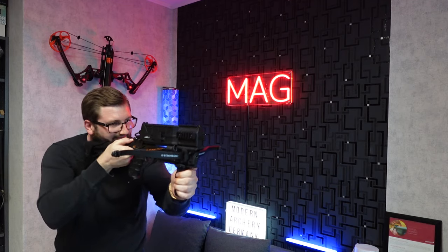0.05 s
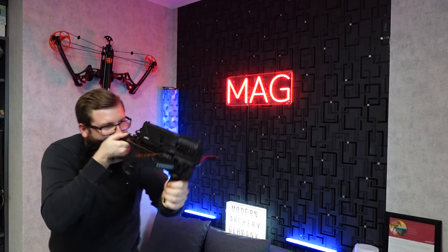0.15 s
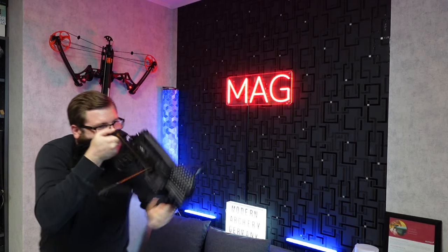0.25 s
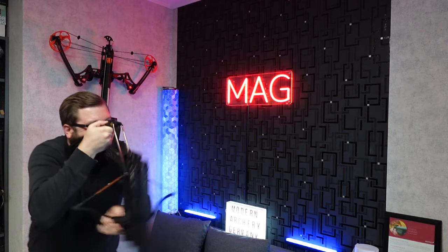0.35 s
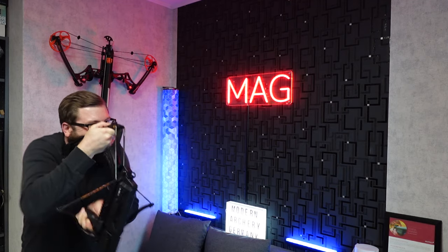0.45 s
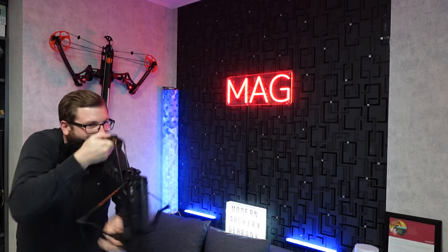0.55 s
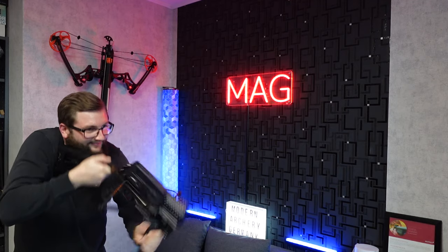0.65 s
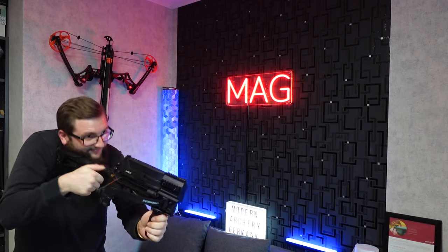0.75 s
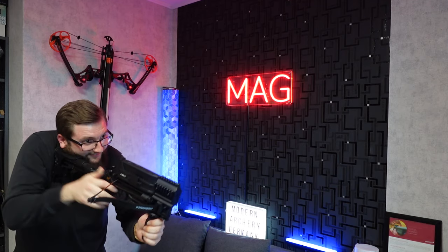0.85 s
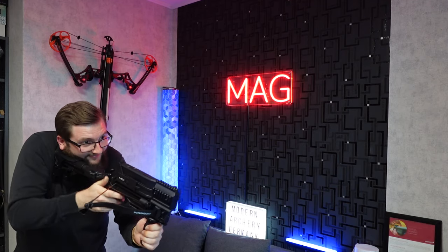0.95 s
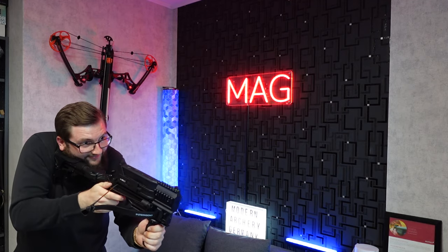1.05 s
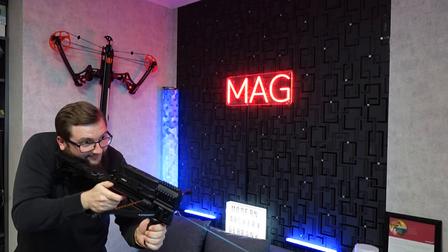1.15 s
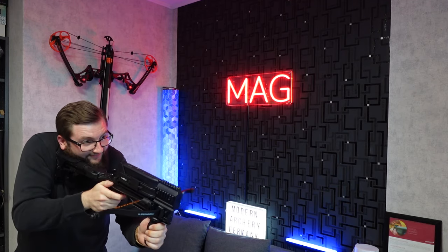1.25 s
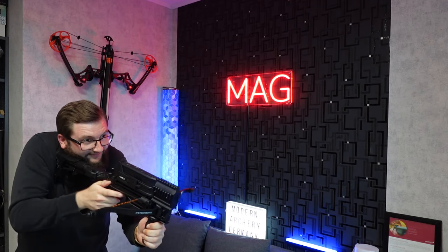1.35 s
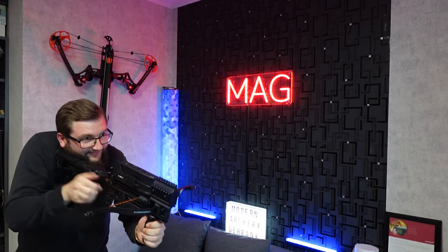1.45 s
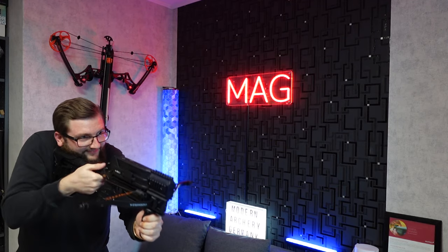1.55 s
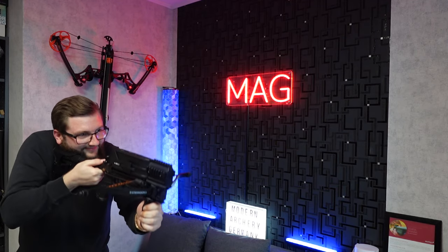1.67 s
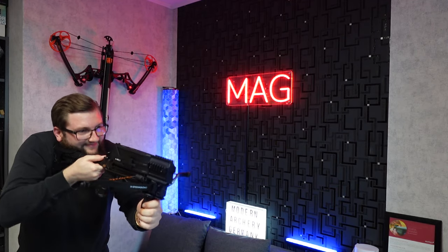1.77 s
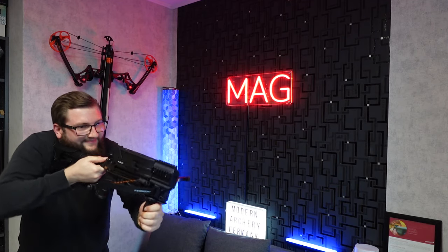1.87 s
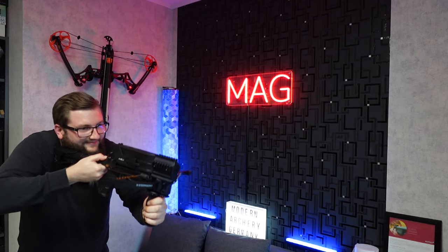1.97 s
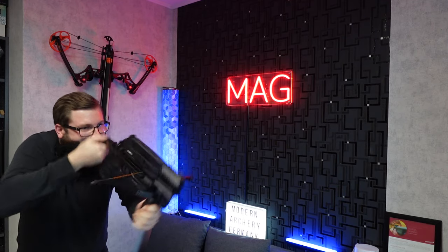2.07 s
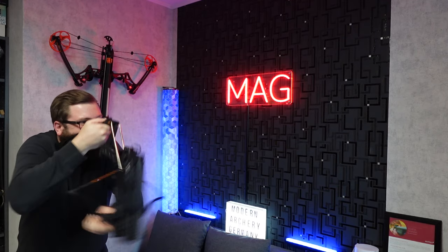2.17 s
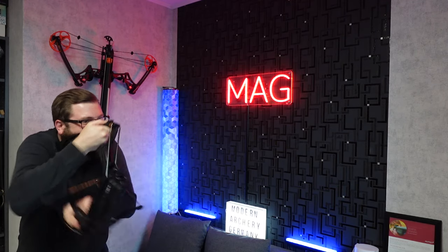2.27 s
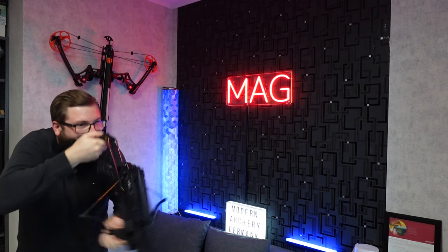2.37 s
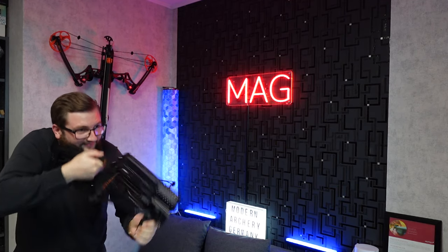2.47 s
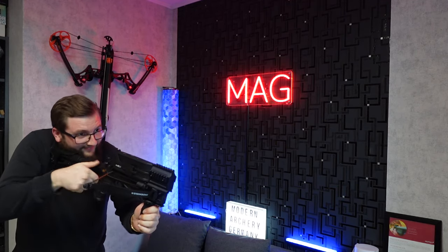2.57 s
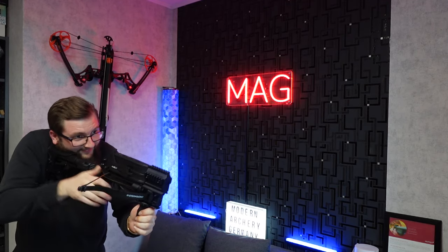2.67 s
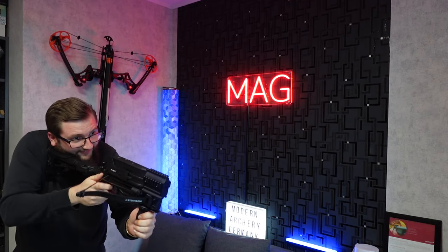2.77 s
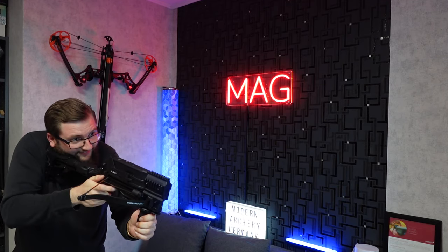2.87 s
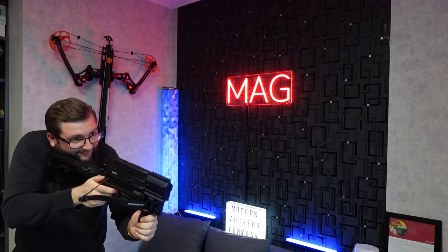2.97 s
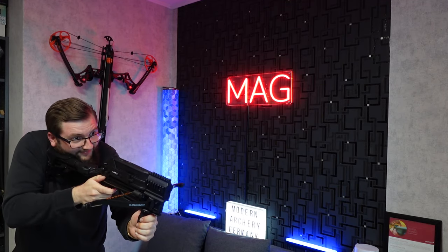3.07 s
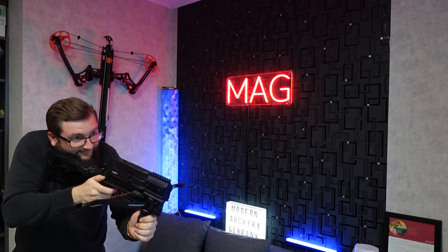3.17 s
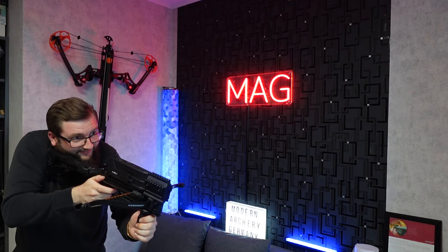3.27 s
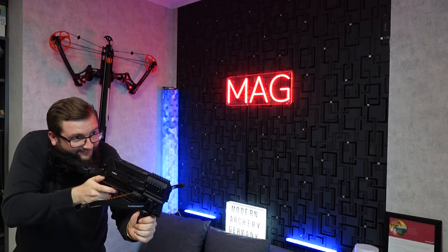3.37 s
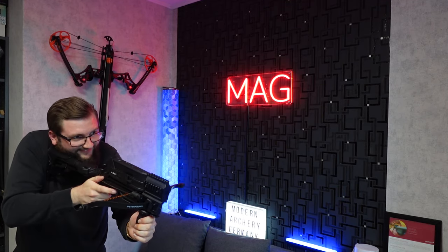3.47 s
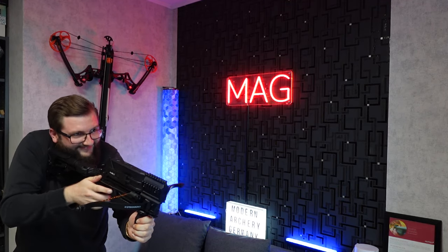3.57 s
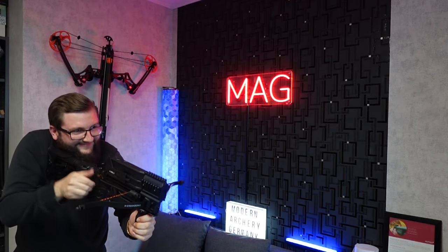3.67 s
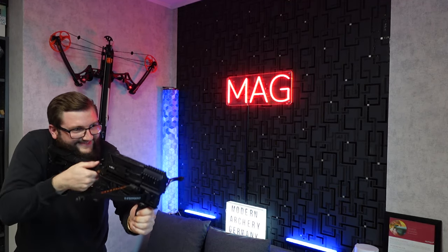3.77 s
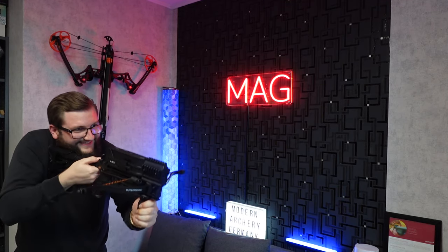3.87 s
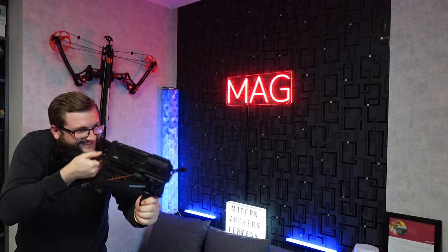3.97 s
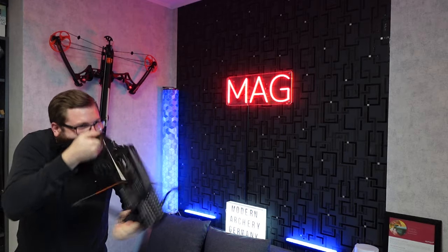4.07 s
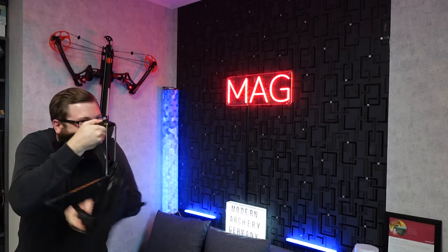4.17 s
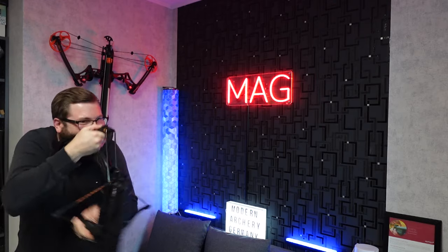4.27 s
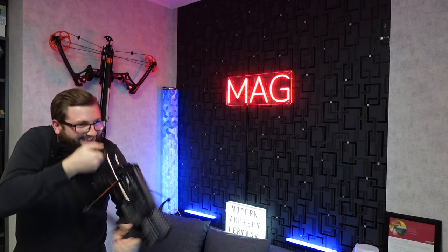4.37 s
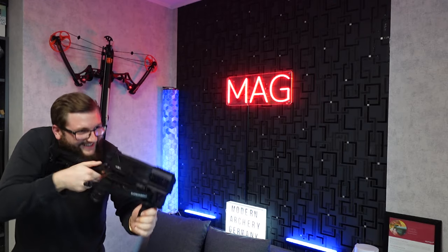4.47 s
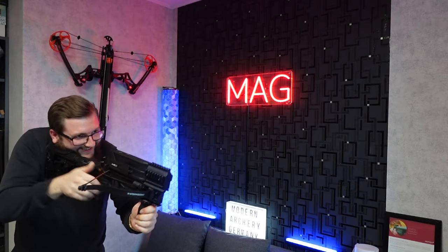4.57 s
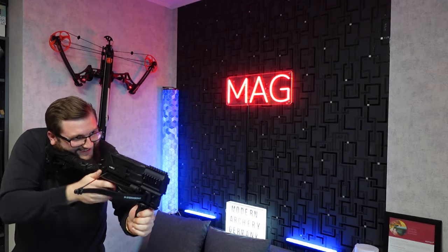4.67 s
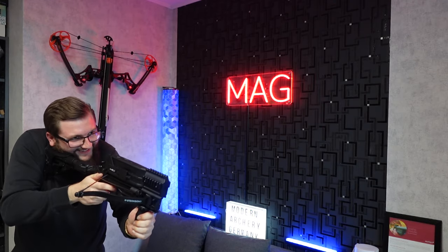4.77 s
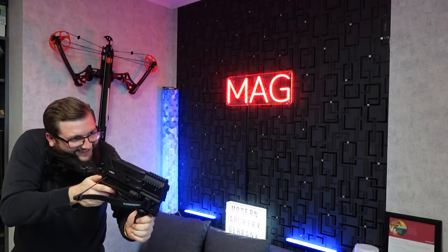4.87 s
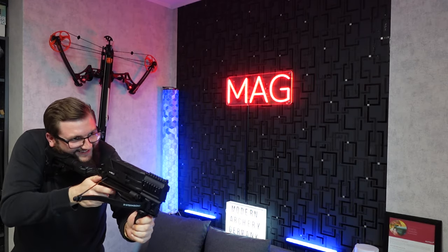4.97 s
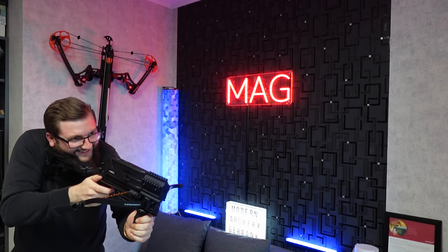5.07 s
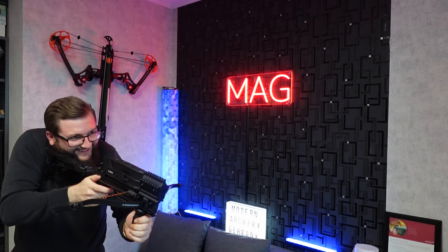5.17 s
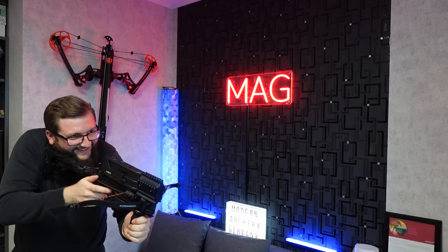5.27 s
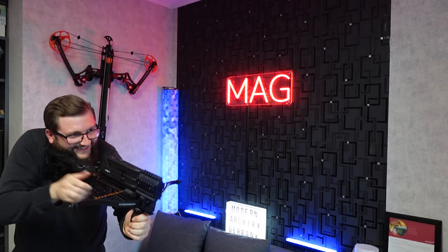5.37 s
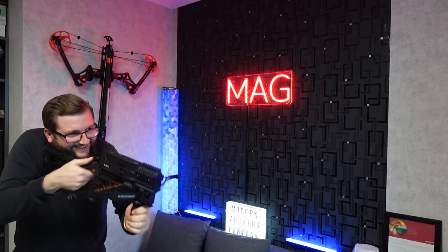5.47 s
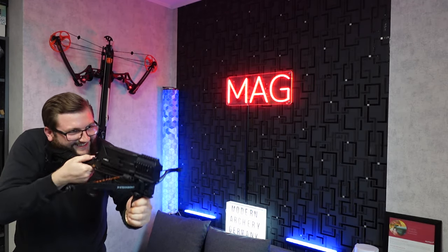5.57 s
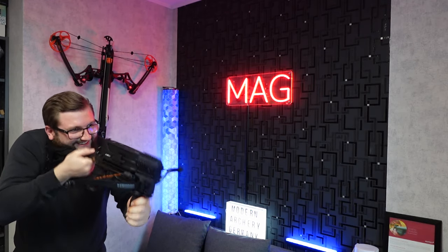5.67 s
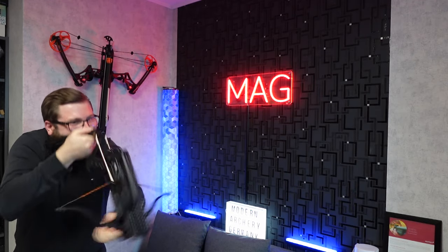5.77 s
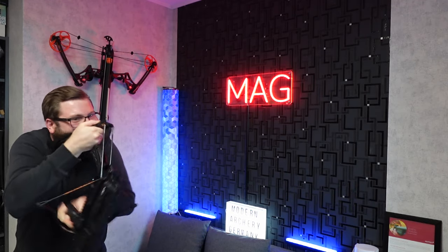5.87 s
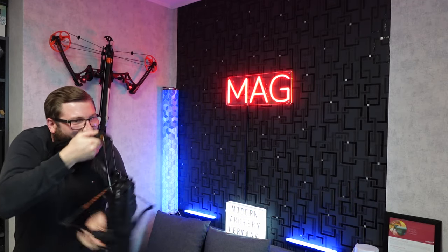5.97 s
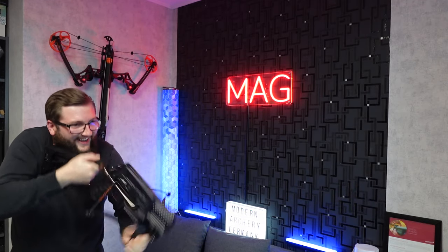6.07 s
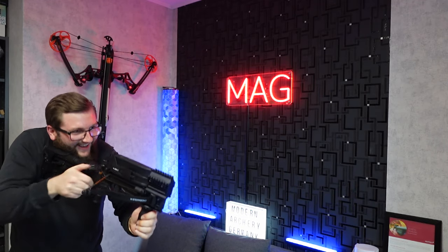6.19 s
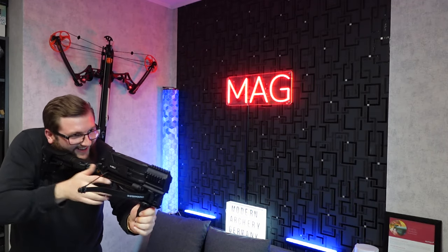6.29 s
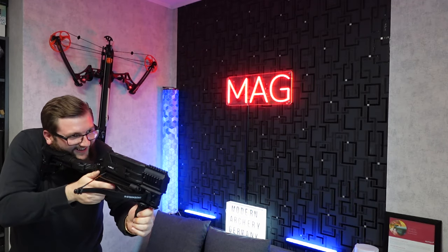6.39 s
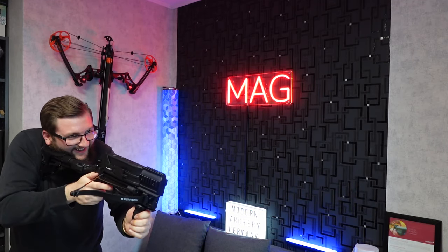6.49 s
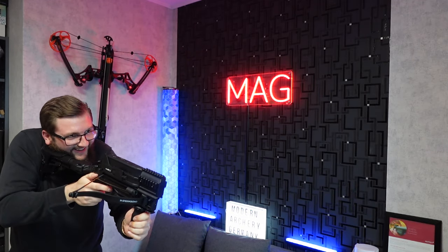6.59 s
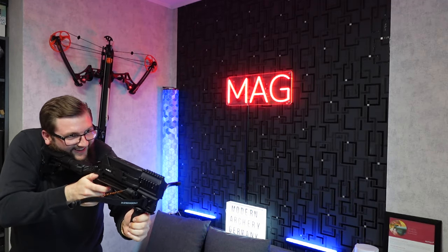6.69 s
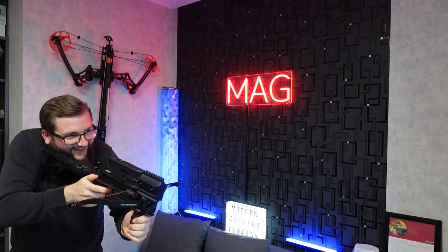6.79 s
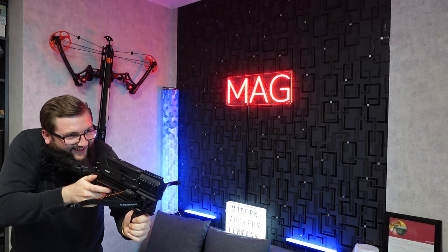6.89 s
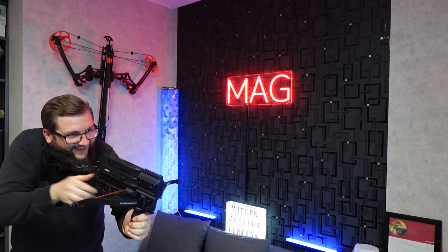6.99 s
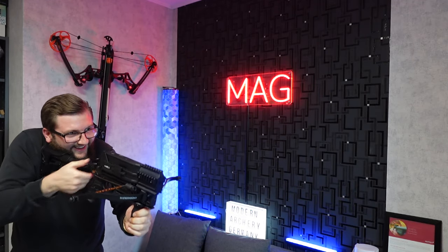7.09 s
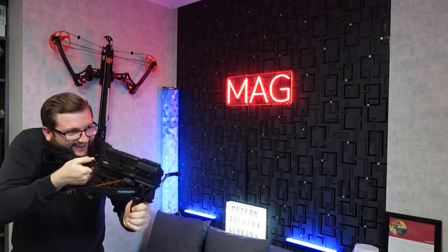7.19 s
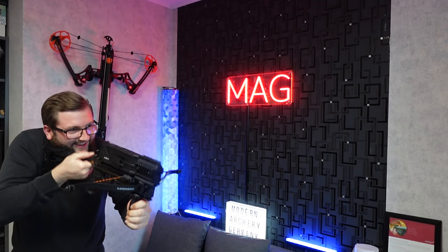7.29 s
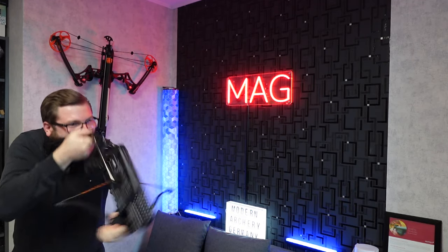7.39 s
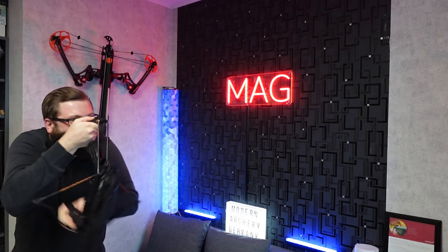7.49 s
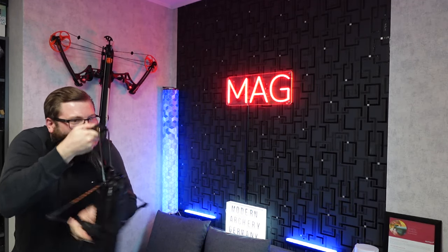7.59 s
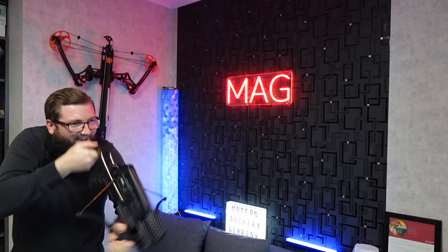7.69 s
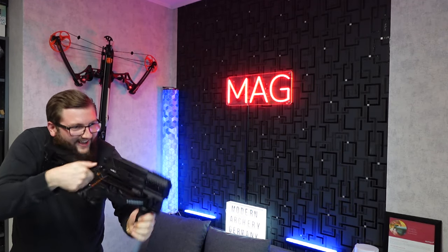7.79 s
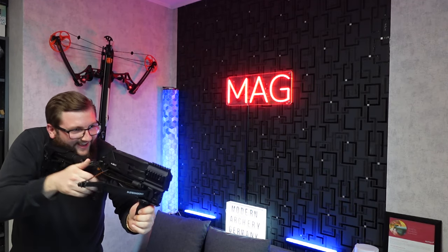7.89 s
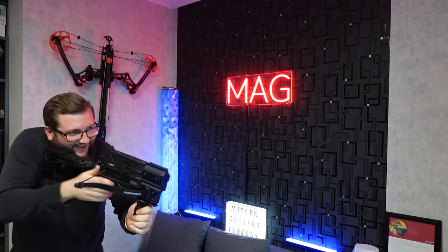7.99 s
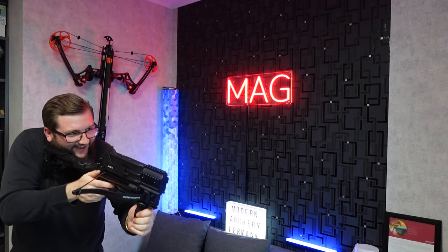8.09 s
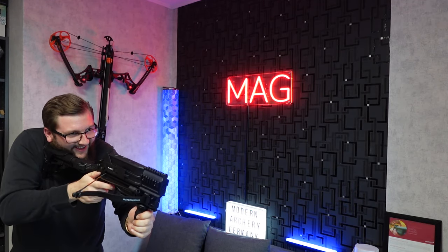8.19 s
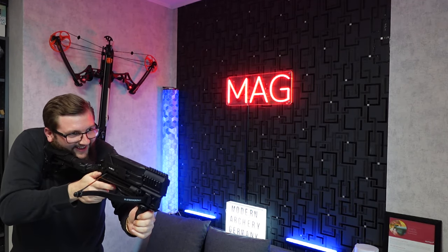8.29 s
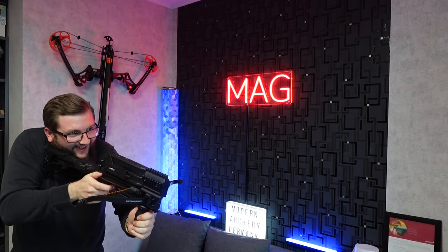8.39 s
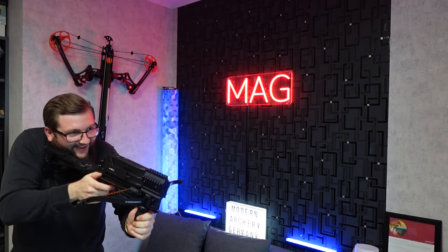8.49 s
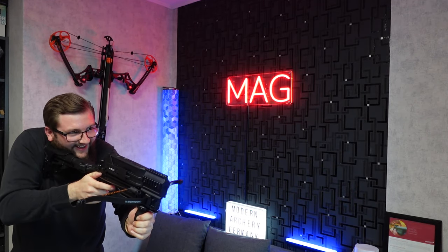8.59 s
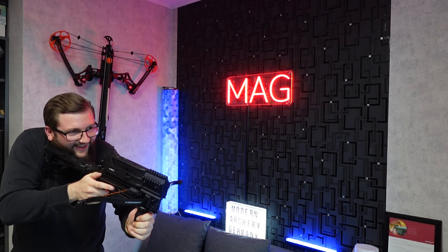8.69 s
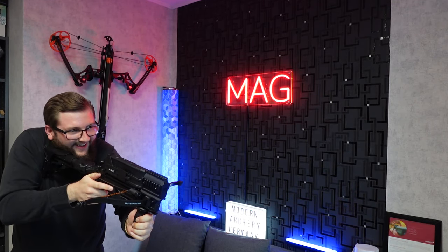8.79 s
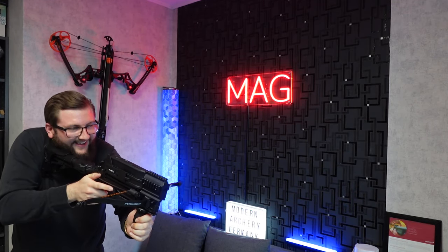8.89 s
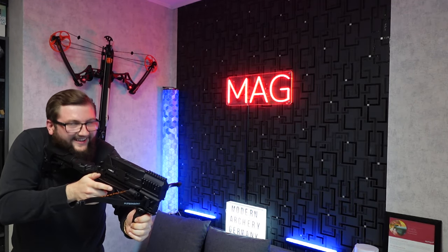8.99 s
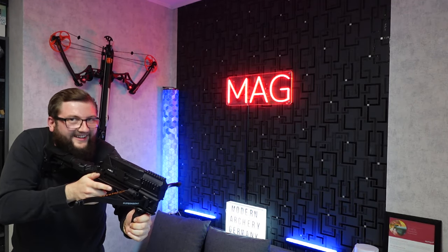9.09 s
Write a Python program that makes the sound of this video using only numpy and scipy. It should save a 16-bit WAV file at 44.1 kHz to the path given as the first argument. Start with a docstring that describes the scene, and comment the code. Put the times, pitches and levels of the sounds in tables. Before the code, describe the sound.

Close, dry and punchy crossbow handling indoors. The lever unlocks, grinds along its rail and snaps open, then returns with a catch click and a loud double-edged latch clack, leaving a faint string hum. After a brief pause the shot cracks and rattles, almost merging with a woody, booming target hit farther off. Five such cycles run at a quick steady pace over a faint hush, with loose bolts chattering and steel tinkling.

```python
"""A lever-cocked repeating crossbow is worked and fired five times in a small, hushed room.
In each cycle the lever unlocks with a click, scrapes open along its rail (rough noise through shifting
resonances) and snaps against a stop. It is pulled back, catches the string and latches; the string hums.
A bolt drops, then the string cracks forward and the limbs rattle (short noise bursts), and the bolt thuds
into a target across the room (a burst plus dying tones). Echoes follow, and a fast limiter holds the peaks."""
import sys
import numpy as np
from scipy import signal
from scipy.fft import rfft, irfft, next_fast_len
from scipy.io import wavfile
from scipy.ndimage import uniform_filter1d, minimum_filter1d, map_coordinates

SR = 44100
rng = np.random.default_rng(int(sys.argv[2]) if len(sys.argv) > 2 else 0)


def to_wav(s):
    """Save 16-bit WAV."""
    ch = np.atleast_2d(s).T  # columns
    pcm = np.round(np.clip(ch, -1, 1) * 32767)  # PCM
    wavfile.write(sys.argv[1], SR, pcm.astype(np.int16))


N = 403074  # length in samples

# Levels and brightness in the tables are starting values; the functions add their own trims.
# String releases: [t/s, crack level/dB, sear tick level/dB re crack, limb rattle level/dB re crack,
#                   brightness/dB per octave]
STRING_RELEASES = [(1.24, -5, -28, -4.5, -0.5), (3.137, -5, -55, -4, 0), (5.1209, -5.5, -31, -3.5, 0),
                   (6.7723, -4.5, -32, -5.5, -0.5), (8.4564, -6, -55, -4, 0.2)]
# Bolts striking the target: [t/s, thud level/dB, crack level/dB re thud, shaft buzz level/dB re thud,
#                             shaft pitch factor, target shaking level/dB re thud, favoured f/Hz of the spot hit]
BOLT_HITS = [(1.2958, -7.5, -6, -12, 0.95, -5.5, 950), (3.1932, -10.5, -4.5, -8.5, 1.05, -5.5, 483),
             (5.1757, -10.5, 4, -9, 0.9, -7, 600), (6.829, -9, -11, -25, 1.06, -15.5, 650),
             (8.5113, -6.5, -12, -23, 1.01, -7, 280)]
# Other light clicks: rebounds at the stop, ticks before it, clicks after shots and stray knocks:
# [t/s, level/dB, centre f/Hz]
OTHER_CLICKS = [(0.204, -35, 4350), (0.245, -32, 2086), (0.553, -26, 6800), (0.583, -25, 2110),
                (1.416, -31, 5710), (1.836, -46, 2600), (2.328, -16, 7000), (2.421, -27, 2150),
                (2.656, -21, 2254), (3.416, -35, 6010), (3.624, -46, 3740), (4.242, -23, 6000),
                (5.494, -49, 1445), (6.169, -25.5, 2352), (6.429, -39, 2490), (6.972, -34, 5820),
                (7.556, -22, 5760), (7.62, -22, 5955), (8.103, -39, 3280)]
# Ringing tones of loose steel: [f/Hz, level/dB, t60/s]; t60 is the time to fade by 60 dB
STEEL_TONES = [(7009, -20, 0.15), (10800, 1, 0.095), (10870, -1.5, 0.089), (13665, -12, .17),
               (13900, -18, .12)]
# Ringing tones of the target: [f/Hz, level/dB, t60/s]
TARGET_TONES = [(192, -10.5, .17), (266.1, -1.5, 0.23), (301, -3, 0.14), (461, 2.5, 0.13), (572, -2, 0.22),
                (667, -1.5, 0.058), (913, -1.5, .15)]
# Resonances of the sliding frame: [f/Hz, width/Hz, level/dB]
FRAME_RESONANCES = [(1030, 160, 12), (2050, 400, 1), (3450, 500, 3.5), (5300, 700, 3.5)]
# Noise colour of the string's crack: [f/Hz, level/dB]
CRACK_COLOUR = [(30, -34.5), (120, -13), (270, 3.5), (380, -3), (520, 5), (1200, -0.5), (1900, 7),
                (3200, -4), (7500, -1.5), (11000, -9), (16000, -18.5)]
# Noise colour of the rattling limbs: [f/Hz, level/dB]
LIMB_COLOUR = [(50, -40), (180, -24), (330, -12), (600, -12), (900, -0.5), (1250, -5), (1850, -3),
               (2700, -9), (6000, -5.5), (9000, -15), (16000, -26)]
# Noise colour of the punched target face: [f/Hz, level/dB]
THUD_COLOUR = [(30, -40), (110, -16), (240, 0), (370, -3), (500, 1), (1000, -2.5), (1400, -10), (2500, -13),
               (6000, -25), (16000, -38)]
# Noise colour of the buzzing bolt shaft: [f/Hz, level/dB]
SHAFT_COLOUR = [(500, -36), (1600, -4.5), (2500, -5.5), (3700, 1.5), (5600, 0.5), (7000, -11.5),
                (11000, -21), (16000, -30)]
# Noise colour of hard parts meeting: [f/Hz, level/dB]
CLACK_COLOUR = [(100, -27.5), (500, -2), (950, 15.5), (1400, 6), (2100, 7), (3200, 3.5), (5500, 4.5),
                (8000, 1), (11000, -7.5), (16000, -17.5)]
# Noise colour of the knocked stock: [f/Hz, level/dB]
STOCK_COLOUR = [(25, -12), (80, -5.5), (180, -1), (380, 6.5), (550, 1.5), (850, 5.5), (1400, -1.5),
                (4000, -29), (16000, -64)]
# Noise colour of the scraping rail: [f/Hz, level/dB]
SCRAPE_COLOUR = [(30, -24), (90, -9), (350, -4), (650, 1.5), (1200, 6.5), (2800, -2.5), (6500, -5),
                 (10000, -10.5), (16000, -18)]
# Noise colour of the quiet room: [f/Hz, level/dB]
HUSH_COLOUR = [(25, 4), (100, -14), (280, -9), (480, -5), (750, -2), (1300, -13), (2500, -16),
               (6000, -19.5), (16000, -32)]
# Noise colour of the rasping magazine: [f/Hz, level/dB]
RASP_COLOUR = [(100, -29.5), (700, -7), (1200, -4), (1700, 3), (2400, -4), (4000, -14.5), (8000, -28),
               (16000, -32.5)]
# How long the room's echo lasts: [f/Hz, t60/s]
ECHO_TIMES = [(100, 0.38), (300, 0.26), (800, .28), (2000, 0.37), (5000, 0.28), (9000, .26), (15000, 0.33)]
# Colour of the room's echo: [f/Hz, level/dB]
ECHO_COLOUR = [(60, -9), (300, -1.5), (6000, -1), (15000, -2)]
# Lever pushed open: [unlock t/s, unlock click level/dB, slack friction level/dB, meets rail t/s,
#                     rail click level/dB, rail friction level/dB, hits stop t/s, snap level/dB,
#                     stock knock level/dB, brightness/dB per octave]
LEVER_OPENINGS = [(0.115, -17.5, -49.5, 0.375, -29, -29.5, 0.499, -12.5, -19.5, 1),
                  (1.992, -21.5, -59, 2.13, -24.5, -30.5, 2.308, -9, -19, 1),
                  (3.999, -29, -60, 4.091, -34, -32, 4.273, -10, -17.5, 2.5),
                  (5.662, -28, -65, 5.782, -32, -31, 5.953, -11.5, -16.5, 4.5),
                  (7.321, -33, -63, 7.414, -34.5, -32.5, 7.585, -8, -18.5, 5.5)]
# Lever pulled shut: [mid-stroke change of friction level/dB, string caught t/s, catch click level/dB,
#                     latched t/s, snap level/dB, stock knock level/dB, brightness/dB per octave,
#                     next bolt drops t/s, drop level/dB]
LEVER_CLOSINGS = [(-6, 0.748, -24, 0.783, -7, -18.5, 2, 0.864, -42),
                  (11, 2.558, -18.5, 2.61, -9.5, -21, 1, 2.679, -16),
                  (3, 4.514, -21, 4.545, -8, -20, 0, 4.623, -20.5),
                  (4, 6.192, -20.5, 6.225, -10, -16.5, -1, 6.313, -20),
                  (3, 7.818, -22, 7.883, -8.5, -21, 0.5, 7.995, -21)]
# Loose steel set ringing: [t/s, level/dB]
STEEL_PINGS = [(2.686, -29.5), (4.625, -41), (5.83, -45), (6.316, -31), (6.478, -45), (6.846, -29.5),
               (7.997, -30)]

# Where each part's click is strongest
UNLOCK_HZ, SLACK_HZ, RAIL_HZ, PAWL_HZ, CATCH_HZ, DROP_HZ = 4400, 1500, 2250, 6500, 3250, 6550
SLACK_LAG_S, SLACK_KNOCK_DB = .009, -12  # the unlocked lever falls slack; level re the unlock click
PAWL_LEAD_S, PAWL_DB = .017, -29  # a pawl ticks just before the open stop
STOP_T60_S, LATCH_T60_S = .06, .03  # frame rattle at either end of the stroke
# The latch hook strikes before it seats; HOOK_DB is relative to the latch snap
HOOK_LEAD_S, HOOK_DB, HOOK_KNOCK_DB, HOOK_T60_S = .005, -4.5, -32, .012
PUSH_SWELL_DB, FULL_SPEED_LEAD_S, PUSH_EASE_DB = 12, .05, 3.5  # the push grows, then eases before the stop
PULL_DB = -41.5  # friction of the steady pull
SURGE_AT_S, SURGE_S = .135, .035  # mid-stroke change: delay after the stop, and width
GRIP_DB_PER_S, RELEASE_DB_PER_S = 420, 330  # how fast friction sets in and dies
RASP_LEAD_S, RASP_DB = .068, -37  # the magazine rasps as the string nears full draw
STRING_HZ, STRING_T60_S, STRING_DB = 366, .3, -29  # the drawn string, plucked by the latch
TOP_HZ = 15900  # upper band limit


def amp(db):
    """Turn decibels into a gain."""
    return 10 ** (np.asarray(db) / 20)


def unit(x):
    """Scale x to an average strength (rms) of 1."""
    return x / np.sqrt(np.mean(x ** 2) + 1e-20)


def along(points, hz):
    """Read a value between (Hz, value) points, on a log frequency axis."""
    f, v = np.transpose(points)
    return np.interp(np.log(hz + 1), np.log(f + 1), v)


def clock():
    """Time since a blow, for half a second."""
    return np.arange(SR // 2) / SR


def add(track, s, sound):
    """Mix a sound into the track at time s."""
    start = max(round(s * SR), 0)
    track[start:start + len(sound)] += sound[:N - start]


def wobble(rate):
    """A smooth random curve with rate knots a second."""
    knots = rng.standard_normal(int(N * rate / SR) + 4)
    return map_coordinates(knots, [np.arange(N) * rate / SR])


def colour(x, shape):
    """Filter with the gain shape(Hz) in dB, without sounding early; white noise keeps its power."""
    m = 2 * next_fast_len(len(x) // 2 + SR // 16)
    gain = unit(amp(shape(np.fft.rfftfreq(m, 1 / SR) + 1)))
    # folding the cepstrum forward in time makes the filter minimum-phase
    cepstrum = irfft(np.log(gain + 1e-6), m)
    cepstrum[1:m // 2] *= 2
    cepstrum[m // 2 + 1:] = 0
    response = np.exp(rfft(cepstrum))
    return irfft(rfft(x, m) * response, m)[:len(x)]


def burst(spectrum, t60, rise, tilt_db=0):
    """A blow into many close modes: coloured noise that swells and dies; tilt_db brightens it per octave."""
    t = clock()
    envelope = amp(-60 * t / max(t60, .002)) * (1 - np.exp(-t / max(rise, 1e-5)))
    grit = rng.choice([-1, 1], len(t)) * envelope / envelope.max()
    return colour(grit, lambda hz: along(spectrum, hz) + tilt_db * np.log2(np.maximum(hz, 500) / 4000))


def ring(modes, attack, pitch=1, scatter_db=2):
    """Dying tones of a struck body, each a little louder or softer every time."""
    t = clock()
    tones = np.zeros(len(t))
    for hz, db, t60 in modes:
        level = amp(db + scatter_db * rng.normal() - 60 * t / t60)
        tones += level * np.sin(2 * np.pi * (hz * pitch * t + rng.random()))
    return tones * (1 - np.exp(-t / attack))


def favour(hz, centre_hz, focus_db):
    """Weaken frequencies (in dB) away from those that a contact excites best."""
    return -focus_db * np.minimum(np.log2(hz / centre_hz) ** 2, 9)


def focused(spectrum, centre_hz, focus_db):
    """A noise colour concentrated around one frequency."""
    return [(hz, level + favour(hz, centre_hz, focus_db)) for hz, level in spectrum]


def latch_times():
    """The moments at which the lever locks shut."""
    return [s for _, _, _, s, *_ in LEVER_CLOSINGS]


def stroke(t, start, end, db, swell_db=0, ease_db=0):
    """Friction in dB of one movement: it sets in, swells up to db, eases and dies."""
    speed_db = np.interp(t, [start, end - FULL_SPEED_LEAD_S, end], [-swell_db, 0, -ease_db])
    before_db = GRIP_DB_PER_S * np.maximum(start - t, 0)
    after_db = RELEASE_DB_PER_S * np.maximum(t - end, 0)
    return db + speed_db - before_db - after_db


def friction(t):
    """Friction in dB: slack lever, push to the stop, then a pull whose friction changes on the way."""
    moves = []
    for opening, closing in zip(LEVER_OPENINGS, LEVER_CLOSINGS):
        unlock_s, _, slack_db, rail_s, _, push_db, stop_s, *_ = opening
        surge_db, _, _, latch_s, *_ = closing
        surge = surge_db * np.exp(-((t - stop_s - SURGE_AT_S) / SURGE_S) ** 2)
        moves.append(stroke(t, unlock_s, rail_s, slack_db))
        moves.append(stroke(t, rail_s, stop_s, push_db, PUSH_SWELL_DB, PUSH_EASE_DB))
        moves.append(stroke(t, stop_s, latch_s, PULL_DB) + surge)
    return np.max(moves, axis=0)


def room_hush():
    """The quiet room: coloured noise whose level drifts gently."""
    level = amp(-69 + 1.8 * wobble(6))
    return level * colour(rng.standard_normal(N), lambda hz: along(HUSH_COLOUR, hz))


def room(x, gap=0.0025, build=0.002):
    """The walls answer after a short gap (s) and build-up (s); each frequency dies at its own speed."""
    hz, t, z = signal.stft(rng.standard_normal(SR // 2), SR, nperseg=256)
    decay = amp(-60 * t / along(ECHO_TIMES, hz)[:, None])
    tail = signal.istft(z * decay, SR, nperseg=256)[1]
    since_gap = np.maximum(np.arange(len(tail)) / SR - gap, 0)
    tail = tail * (1 - np.exp(-since_gap / build))
    tail = colour(tail, lambda f: along(ECHO_COLOUR, f))
    return signal.fftconvolve(x, tail / np.linalg.norm(tail))[:N]


def all_round(source, count=3):
    """The crossbow radiates differently to each wall; the room blends these directions into a smooth tail."""
    return sum(room(source()) for _ in range(count)) / np.sqrt(count)


def grip(per_second=5, level_db=-67, spread_db=9, body_db=-4):
    """The hands shift on the stock: faint ticks and bumps at random moments."""
    out = np.zeros(N)
    for chance, size in rng.random((round(per_second * N / SR), 2)):
        tick = burst(CLACK_COLOUR, t60=.04, rise=.002)
        bump = amp(body_db) * burst(STOCK_COLOUR, t60=.1, rise=.004)
        add(out, chance * N / SR, amp(level_db + spread_db * size) * (tick + bump))
    return out


def loose_bolts(per_second=25, level_db=2, spread_db=6, tinkle_db=-21):
    """Bolts chatter in the magazine at random moments of lever movement and set the steel tinkling."""
    out = np.zeros(N)
    chance, sizes, pitches = rng.random((round(per_second * N / SR), 3)).T
    times = chance * N / SR
    for s, friction_db, size, pitch in zip(times, friction(times), sizes, pitches):
        if friction_db > -66:  # only while the lever moves
            part = focused(CLACK_COLOUR, 1200 * 3 ** pitch, focus_db=2.5)
            tick = burst(part, t60=0.007, rise=.0004)
            tinkle = amp(tinkle_db) * ring(STEEL_TONES, attack=.001)
            add(out, s, amp(friction_db + level_db + spread_db * size) * (tick + tinkle))
    return out


def contacts():
    """Every light contact as (s, dB, centre Hz): six in each lever cycle, and the other light clicks."""
    rows = list(OTHER_CLICKS)
    for unlock_s, unlock_db, _, rail_s, rail_db, _, stop_s, *_ in LEVER_OPENINGS:
        rows.append((unlock_s, unlock_db, UNLOCK_HZ))
        rows.append((unlock_s + SLACK_LAG_S, unlock_db + SLACK_KNOCK_DB, SLACK_HZ))
        rows.append((rail_s, rail_db, RAIL_HZ))
        rows.append((stop_s - PAWL_LEAD_S, PAWL_DB, PAWL_HZ))
    for _, catch_s, catch_db, *_, drop_s, drop_db in LEVER_CLOSINGS:
        rows += [(catch_s, catch_db, CATCH_HZ), (drop_s, drop_db, DROP_HZ)]
    return rows


def clicks(tick_db=1.5, focus_db=4.8, body_db=-13, heft_db=7, rattle_db=-19, lead_in_db=-24):
    """Light contacts: a tick around its own pitch, led by faint noise, with a rattle and a stock knock."""
    out = np.zeros(N)
    for s, db, centre_hz in contacts():
        part = focused(CLACK_COLOUR, centre_hz, focus_db)
        tick = amp(tick_db) * burst(part, t60=0.011, rise=.0006)
        rattle = amp(rattle_db) * burst(part, t60=0.067, rise=0.0077)
        lead_in = amp(db + lead_in_db) * burst(part, t60=0.031, rise=0.0022)
        # lighter, higher-pitched parts knock the stock less
        knock_db = body_db - heft_db * np.log2(centre_hz / RAIL_HZ)
        knock = amp(knock_db) * burst(STOCK_COLOUR, t60=0.11, rise=0.0025)
        add(out, s - .003, lead_in)  # a faint soft noise starting 3 ms before the tick
        add(out, s, amp(db) * (tick + rattle + knock))
    return out


def groan_pitch(t, wander=.05, rise_hz=550, climb_lead=.04, climb_s=.03, sag_hz=170, sag_lead=.09, sag_s=.04):
    """The frame's main resonance wanders with the grip, sags before the open stop and climbs near full draw."""
    stops = [s for *_, s, _, _, _ in LEVER_OPENINGS]
    sag = sum(np.exp(-((t - s + sag_lead) / sag_s) ** 2) for s in stops)
    climb = sum(np.exp(-((t - s + climb_lead) / climb_s) ** 2) for s in latch_times())
    drift = 1 + wander * np.interp(t, np.arange(N) / SR, wobble(16))
    return FRAME_RESONANCES[0][0] * drift - sag_hz * sag + rise_hz * climb


def sliding(level_db=-1.0, slips=900, slip_db=-5, judder_db=4.5, lurch_db=2.1, patchy_db=3.4):
    """The lever judders along its rail: scrape and slips excite shifting resonances; the magazine rasps."""
    force = amp(friction(np.arange(N) / SR))
    grains = (rng.random(N) < slips / SR) * rng.choice([-1, 1], N)  # slips is the average per second
    uneven_db = judder_db * np.tanh(wobble(160)) + lurch_db * np.tanh(wobble(40))
    rub = (rng.standard_normal(N) + amp(slip_db) * unit(grains)) * amp(uneven_db)
    hz, t, z = signal.stft(rub, SR, nperseg=512)
    hz = hz[:, None]
    # only the first resonance moves
    centres = [groan_pitch(t)] + [centre for centre, _, _ in FRAME_RESONANCES[1:]]
    frame_db = 0
    for centre, (_, width, db) in zip(centres, FRAME_RESONANCES):
        frame_db = frame_db + db / (1 + (2 * (hz - centre) / width) ** 2)
    # the contact point moves, so the colour changes from moment to moment
    patches = uniform_filter1d(rng.standard_normal(z.shape), size=4, axis=0)
    patches = unit(uniform_filter1d(patches, size=8, axis=1))
    gain = amp(along(SCRAPE_COLOUR, hz) + frame_db + patchy_db * patches)
    scrape = signal.istft(z * gain, SR, nperseg=512)[1][:N]
    out = amp(level_db) * force * unit(scrape)
    for s in latch_times():
        add(out, s - RASP_LEAD_S, amp(RASP_DB) * burst(RASP_COLOUR, t60=0.15, rise=.04))
    return out


def ringing(chatter_db=3):
    """Loose steel tinkles and chatters after some contacts; the drawn string hums once it is latched."""
    steel, string = np.zeros(N), np.zeros(N)
    for s, db in STEEL_PINGS:
        add(steel, s, amp(db) * ring(STEEL_TONES, attack=.001))
    for s in latch_times():
        hum = ring([(STRING_HZ, 0, STRING_T60_S)], attack=.003, scatter_db=1)
        add(string, s, amp(STRING_DB) * hum)
    return steel * amp(chatter_db * wobble(300)) + string


def hard_stops():
    """Hard stops as (s, snap dB, knock dB, rattle t60, brightness): one on opening, two on latching."""
    rows = [(s, db, body_db, STOP_T60_S, tilt_db) for *_, s, db, body_db, tilt_db in LEVER_OPENINGS]
    for _, _, _, s, db, body_db, tilt_db, *_ in LEVER_CLOSINGS:
        rows.append((s - HOOK_LEAD_S, db + HOOK_DB, HOOK_KNOCK_DB, HOOK_T60_S, tilt_db))
        rows.append((s, db, body_db, LATCH_T60_S, tilt_db))
    return rows


def clacks(snap_db=1.5, knock_db=0, rattle_db=-7, lead_in_db=-18):
    """Hard stops of the lever: a metal snap, a short rattle of the frame and a knock of the stock."""
    out = np.zeros(N)
    for s, db, body_db, t60, tilt_db in hard_stops():
        lead_in = burst(CLACK_COLOUR, t60=0.035, rise=0.0025)
        snap = burst(CLACK_COLOUR, t60=0.0092, rise=0.00035, tilt_db=tilt_db)
        rattle = burst(CLACK_COLOUR, t60=t60, rise=.001, tilt_db=tilt_db)
        knock = burst(STOCK_COLOUR, t60=0.039, rise=.0008)
        add(out, s - .003, amp(db + lead_in_db) * lead_in)  # a faint noise leads each snap by about 3 ms
        add(out, s - .0004, amp(db + snap_db) * snap)
        add(out, s, amp(db + rattle_db) * rattle)
        add(out, s, amp(body_db + knock_db) * knock)
    return out


def impacts(thud_db=0, modes_db=-11, focus_db=1.23, buzz_t60=.29):
    """The bolt punches the target, which booms and shakes while the shaft buzzes."""
    out = np.zeros(N)
    for s, db, crack_db, buzz_db, shaft_pitch, shake_db, spot_hz in BOLT_HITS:
        face = focused(THUD_COLOUR, spot_hz, focus_db)
        modes = [(hz, level + favour(hz, spot_hz, focus_db), t60) for hz, level, t60 in TARGET_TONES]
        shaft = [(hz * shaft_pitch, level) for hz, level in SHAFT_COLOUR]
        blow = amp(thud_db) * burst(face, t60=0.055, rise=.0005)
        boom = amp(modes_db) * ring(modes, attack=0.0024, scatter_db=1.0)
        crack = amp(crack_db + 1.5) * burst(CLACK_COLOUR, t60=.012, rise=.0003)
        buzz = amp(buzz_db) * burst(shaft, t60=buzz_t60, rise=0.014)
        shake = amp(db + shake_db) * burst(face, t60=0.17, rise=0.011)
        add(out, s, amp(db) * (blow + boom + crack + buzz))
        add(out, s + .016, shake)
    return out


def shots(crack_db=0, stop_db=-4.0, stop_delay=.0055, rattle_rise=0.019):
    """The sear ticks, the string cracks free, slams into its stop and leaves the limbs rattling."""
    out = np.zeros(N)
    for s, db, sear_db, rattle_db, tilt_db in STRING_RELEASES:
        sear = burst(CLACK_COLOUR, t60=.05, rise=.0006)
        crack = burst(CRACK_COLOUR, t60=.018, rise=.0007, tilt_db=tilt_db + 2.43)
        slam = burst(CRACK_COLOUR, t60=.07, rise=0.0015, tilt_db=tilt_db)
        rattle = burst(LIMB_COLOUR, t60=.22, rise=rattle_rise, tilt_db=tilt_db)
        add(out, s - .006, amp(db + sear_db) * sear)
        add(out, s, amp(db + crack_db) * crack)
        add(out, s + stop_delay, amp(db + stop_db) * slam)
        add(out, s + .015, amp(db + rattle_db - 8) * rattle)
    return out


def scene():
    """The crossbow is near, the target farther off, over the quiet hush of the room."""
    handling = clicks() + sliding() + loose_bolts() + grip()
    target = impacts()
    direct = handling + clacks() + ringing() + shots() + target
    walls = room(amp(-11.5) * handling + amp(-12) * target)
    walls += amp(-10.0) * all_round(clacks) + amp(-12) * all_round(shots)
    return (direct + walls + room_hush())[None]


def record(dry, low_cut_hz=75, order=3):
    """The microphone thins the bass, a fast limiter holds the peaks, and a steep filter cuts the top."""
    low_cut = signal.butter(order, low_cut_hz, "highpass", fs=SR, output="sos")
    x = signal.sosfilt(low_cut, dry)
    ceiling = .85  # held before the top cut
    needed = np.minimum(1, ceiling / (np.abs(x) + 1e-9))
    gain = uniform_filter1d(minimum_filter1d(needed, size=45), size=45)  # 45 samples, about 1 ms
    m = next_fast_len(N + SR // 2)
    edge = 1 / (1 + (np.fft.rfftfreq(m, 1 / SR) / TOP_HZ) ** 120)
    return irfft(rfft(x * gain, m) * edge, m)[..., :N]


dry = scene()
out = record(dry)
to_wav(out)
```